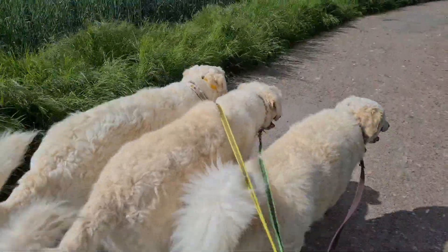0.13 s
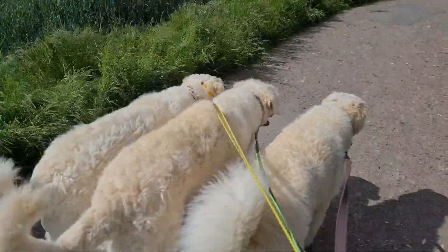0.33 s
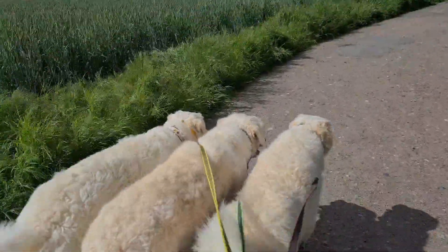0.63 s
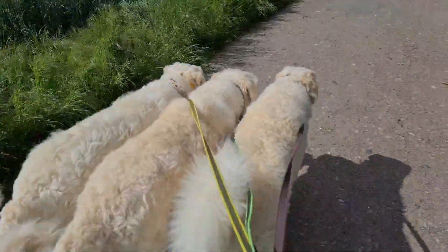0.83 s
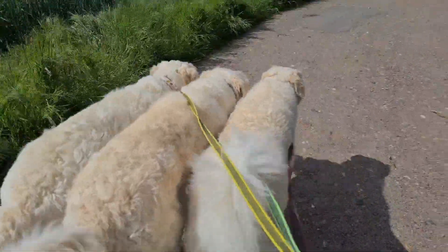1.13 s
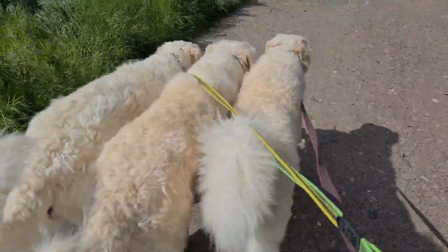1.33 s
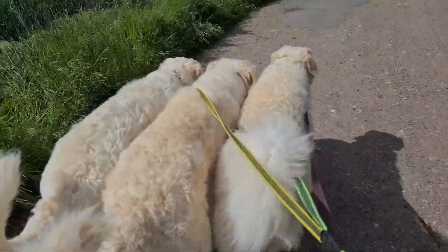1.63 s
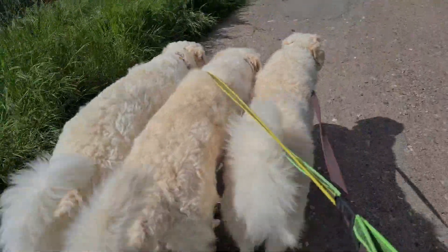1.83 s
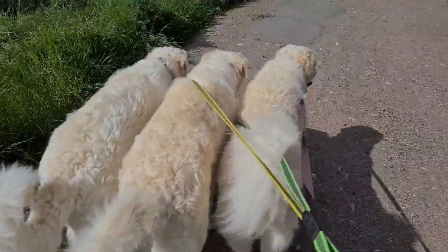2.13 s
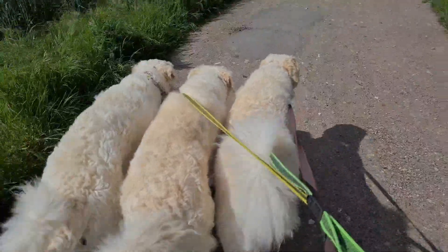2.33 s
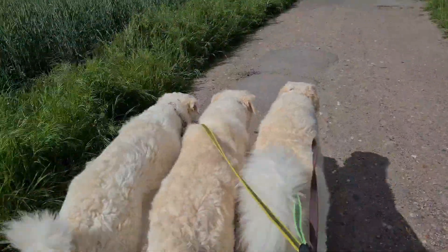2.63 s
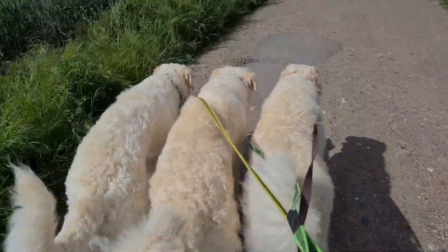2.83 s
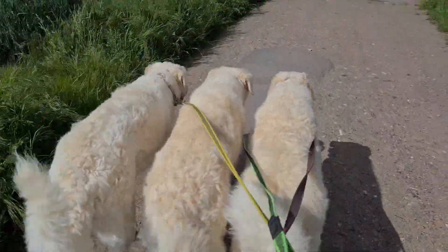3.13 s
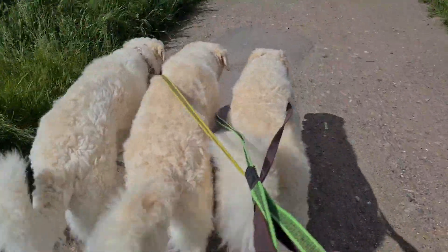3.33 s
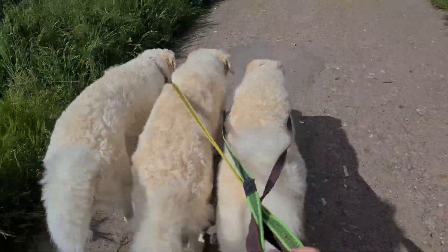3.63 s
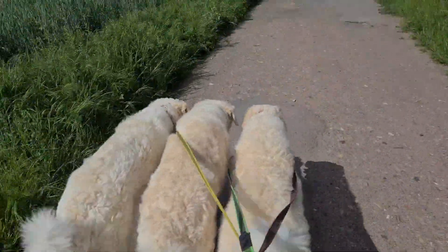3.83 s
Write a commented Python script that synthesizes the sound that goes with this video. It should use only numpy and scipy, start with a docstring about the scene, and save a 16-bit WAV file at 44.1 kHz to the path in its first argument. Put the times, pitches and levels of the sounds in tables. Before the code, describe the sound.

Soft footsteps on grit fall every half second from 0.2 s, each a low heel thud then a short crunchy scuff. Dog paws patter faintly, with irregular claw and stone ticks. A leash clip jingles thinly until about 1.3 s. Low wind buffets the microphone until 2 s, returning slightly at 3.9 s. Grass and cloth rustle quietly over a far hum. A loud, dry stone crack hits at 3.63 s.

```python
"""Walk with dogs on a gritty path

Heels thud and soles scuff on grit in light wind, while claws and small stones tick and one stone cracks sharply.
Knocks and grit are clicks sent through resonances; a leash clip jingles as a set of fading sine tones.
Wind buffeting two microphone ports is low noise, lumpy and gusty.
Grass and cloth rustle over a far hum, both made from bands of noise.
"""
import sys
import numpy as np
from scipy import signal
from scipy.io import wavfile
from scipy.ndimage import uniform_filter1d

SR = 44100
rng = np.random.default_rng(int(sys.argv[2]) if len(sys.argv) > 2 else 0)


def master(y):
    """Save y as 16-bit WAV."""
    cut = np.clip(np.atleast_2d(y).T, -1, 1)
    pcm = np.round(cut * 32767)  # scale
    wavfile.write(sys.argv[1], SR, pcm.astype(np.int16))


N = 176400

# a positive pan is louder on the left; the lag delays the left side
GROUND_PAN_DB, GROUND_LAG_S = 3.5, .00009
CLIP_PAN_DB, CLIP_LAG_S = -1.5, 1 / SR
HISS_TOP_HZ = 15950
GRIT_BITE_DB = -19  # bare click edges, relative to the ringing of the grit


def amp(db):
    """Turn decibels into a gain."""
    return 10 ** (np.asarray(db) / 20)


def unit(x):
    """Scale to an average (rms) level of 1."""
    return x / np.sqrt(np.mean(x ** 2) + 1e-20)


def in_time(rows):
    """Read a table of times and levels at every sample, with straight lines between its points."""
    times, levels = np.transpose(rows)
    return np.interp(np.arange(N) / SR, times, levels)


def at_hz(points, hz):
    """Read a table of pitches and values on a log-frequency axis."""
    pitches, values = np.transpose(points)
    return np.interp(np.log(hz), np.log(pitches), values)


def bandpass(x, low_hz, high_hz, order=2):
    """Keep only the sound between two pitches."""
    sos = signal.butter(order, [low_hz, high_hz], "band", fs=SR, output="sos")
    return signal.sosfilt(sos, x)


def lowpass(x, cutoff_hz, order):
    """Soften everything above a pitch."""
    return signal.sosfilt(signal.butter(order, cutoff_hz, fs=SR, output="sos"), x)


def drift(rate_hz):
    """Slow random wandering with rms 1: noise smoothed twice, on one point per 40 samples."""
    r = np.exp(-2 * np.pi * rate_hz * 40 / SR)
    noise = rng.standard_normal(N // 40 + 2002)
    slow = signal.lfilter([1], [1, -2 * r, r * r], noise)[2000:]  # skip the filter's start
    return np.interp(np.arange(N) / 40, np.arange(len(slow)), unit(slow))


def resonance(x, hz, width_hz):
    """Let a sound ring around one pitch, with gain 1 at the top; a narrow width rings longer."""
    r = np.exp(-np.pi * width_hz / SR)
    feedback = [1, -2 * r * np.cos(2 * np.pi * hz / SR), r * r]
    return signal.lfilter([(1 - r * r) / 2, 0, (r * r - 1) / 2], feedback, x + 1e-18)


def pulse(hz, width_hz):
    """A short knock of peak 1: a click sent through three resonances, the first twice as wide."""
    knock = -np.eye(1, 2048)[0]
    for width in (2 * width_hz, width_hz, width_hz):
        knock = resonance(knock, hz, width)
    return knock / np.abs(knock).max()


def add(out, s, sound):
    """Mix a sound in at a time in seconds."""
    i = int(s * SR)
    out[..., i:i + sound.shape[-1]] += sound[..., :N - i]


def place(x, pan_db, lag_s):
    """Place a mono sound in stereo by level, with the left side hearing it later."""
    late = np.interp(np.arange(len(x)) - lag_s * SR, np.arange(len(x)), x)
    return np.array([late * amp(pan_db / 2), x * amp(-pan_db / 2)])


def scatter(x):
    """A few milliseconds of uneven echoes from legs and ground, different on each side."""
    level_db, fade_s = -31, .004
    t = np.arange(1000) / SR
    tails = amp(level_db) * np.exp(-t / fade_s) * rng.standard_normal((2, 1000))
    return signal.fftconvolve(x[None], tails, axes=1)[:, :N]


def banded_noise(spectrum, patchy_db):
    """Half-octave bands of stereo noise, each with its own level, flicker and likeness; rms 1."""
    # how alike left and right are, 1 being the same: (pitch [Hz], likeness [ratio])
    likeness = [(100, 0.96), (400, 0.78), (800, 0.39), (1600, 0.049), (15000, 0.01)]
    out, edges = 0, 22 * 2 ** np.arange(0, 9.9, .5)
    white = rng.standard_normal((2, 2, N))
    for k, (low, high) in enumerate(zip(edges, edges[1:])):
        mid, side = bandpass(white[k % 2], low, high)  # neighbouring bands use different noise
        hz = np.sqrt(low * high)
        alike = np.clip(at_hz(likeness, hz), -1, 1)
        gain = amp(at_hz(spectrum, hz) + patchy_db * drift(11.8))
        shared = np.sqrt(1 + alike) * mid
        opposed = np.sqrt(1 - alike) * side * [[1], [-1]]
        out = out + gain * (shared + opposed)
    top_cut = signal.cheby2(12, 50, HISS_TOP_HZ + 200, fs=SR, output="sos")
    return unit(signal.sosfilt(top_cut, out))


def grains(rate, spread_db, bite_db):
    """Random clicks (rate per second) of uneven size, ringing like grit with some bare edge; rms 1."""
    # resonances of grit under soles and claws: (pitch [Hz], width [Hz], level [dB])
    grit = [(611, 180, -3.5), (1154, 153, 2.5), (1986, 505, 0), (2550, 590, 1), (3300, 1760, -2.5)]
    dull_above_hz, edge_low_hz, colour_db = 4860, 3680, 5
    sizes = amp(spread_db * np.minimum(rng.exponential(1, N), 4))
    clicks = (rng.random(N) < rate / SR) * sizes * rng.choice([-1, 1], N)
    dull = lowpass(clicks, dull_above_hz, 4)
    rings = np.zeros(N)
    for k, (hz, width_hz, db) in enumerate(grit):
        uneven = dull * amp(colour_db * rng.standard_normal(N))  # each resonance is struck differently
        rings += amp(db) * resonance(uneven, hz, width_hz) * (-1) ** k
    edge = bandpass(clicks * rng.standard_normal(N), edge_low_hz, HISS_TOP_HZ)
    return unit(unit(rings) + amp(bite_db) * unit(edge))


def wind():
    """Buffeting as lumpy low rumble, separate at each port; strong gusts also reach higher in pitch."""
    # wind strength before lumps and panning: (time [s], level [dB])
    strength = [(0, -41.5), (.13, -50), (.19, -33), (.25, -49), (.41, -33), (.49, -40), (.56, -29.5),
                (.66, -36), (.715, -24.5), (.77, -52), (.86, -32), (.97, -42), (1.02, -28.5), (1.1, -37),
                (1.17, -33.5), (1.24, -48), (1.31, -31), (1.36, -39), (1.5, -41.5), (1.55, -30.5),
                (1.61, -23.5), (1.66, -56), (1.79, -43.5), (1.87, -29.5), (2.01, -40.5), (2.08, -66),
                (3.85, -55.5), (3.94, -31), (4, -34.5)]
    low_hz, high_hz, edge_hz = 43.7, 81.7, 229
    lump_db, lump_rate_hz, pan_db = 2.5, 18.5, -1.2
    gust_db, edge_db, reach = -36, -20.5, 1.6  # the higher edge grows 1.6 times as fast in dB
    level_db = in_time(strength)
    out = []
    for side in (1, -1):
        white = rng.standard_normal((2, N))
        body = unit(bandpass(white[0], low_hz, high_hz))
        edge = unit(bandpass(np.cumsum(white[1]), high_hz, edge_hz))
        # even out the noise's own swells, so that the level curve shapes it
        even = body / np.sqrt(uniform_filter1d(body ** 2, size=1300) + 0.014)
        port_db = level_db + side * pan_db / 2 + lump_db * drift(lump_rate_hz)
        rumble = amp(port_db) * lowpass(even, edge_hz * .5, 2)
        gust_edge = amp(gust_db + edge_db + reach * (port_db - gust_db)) * edge
        out.append(rumble + gust_edge)
    return np.array(out)


def rustle():
    """Grass and cloth brushing: flickering bands of noise that swell and fade."""
    # brushing strength before the lift: (time [s], level [dB])
    strength = [(0, -65), (.15, -56.5), (.2, -73), (.26, -59), (.45, -68), (.7, -61.5), (.86, -65.5),
                (1.27, -63), (1.45, -70), (1.62, -61.5), (1.82, -61.5), (1.92, -69), (2.05, -60.5),
                (2.15, -63.5), (2.75, -62.5), (2.87, -67), (3.03, -60), (3.1, -65.5), (3.2, -61.5),
                (3.42, -67), (3.7, -63.5), (4, -60.5)]
    # tone colour: (pitch [Hz], level [dB per Hz, up to a common shift])
    colour = [(300, -13), (700, 10), (1500, 5.5), (7000, 3.5), (9000, -10.5), (12000, -4), (15500, 5)]
    lift_db, pan_db, patchy_db = 11, -3.5, 1.0
    level = amp(in_time(strength) + lift_db)
    sides = amp([[pan_db / 2], [-pan_db / 2]])
    return level * sides * banded_noise(colour, patchy_db)


def far_hum():
    """The far hum of the open field: steady noise, strongest in the low bands."""
    # tone colour: (pitch [Hz], level [dB per Hz, up to a common shift])
    colour = [(30, -5.5), (60, 2), (120, -9.5), (250, -9.5), (500, -9.5), (900, -19.5), (1500, -19.5),
              (3000, -40.5), (6500, -27), (10000, -42.5)]
    level_db, patchy_db = -53, .7
    return amp(level_db) * banded_noise(colour, patchy_db)


def paws():
    """Faint patter of many paws: random grit clicks whose level slowly wanders."""
    # patter strength before wandering and panning: (time [s], level [dB])
    strength = [(0, -58), (1.2, -55.5), (1.9, -61.5), (4, -56)]
    swing_db, swing_rate_hz = 2.5, 1.5
    level_db = in_time(strength) + swing_db * drift(swing_rate_hz)
    patter = amp(level_db) * grains(rate=450, spread_db=2.5, bite_db=GRIT_BITE_DB)
    return place(patter, GROUND_PAN_DB, GROUND_LAG_S)


def leash_clip():
    """Metal parts touch and ring at their own pitches, unevenly as they keep rattling."""
    modes = [(8540, .07), (9480, .08), (9650, .07), (10270, .1), (12880, .07), (13290, .09), (15580, .07)]
    # touches, before rattle and panning: (time [s], then one level [dB] for each mode)
    touches = [(0.0, -51, -49, -40, -67, -50, -68, -43), (0.109, -42, -44, -70, -70, -39, -70, -55),
               (0.128, -43, -44, -68, -56, -60, -70, -47), (.144, -45, -44, -68, -70, -58, -70, -60),
               (0.5936, -31.5, -66, -46, -34, -56, -62, -35), (0.898, -45, -68, -47, -60, -70, -52, -44),
               (0.918, -46.5, -60, -51, -66, -70, -53, -56), (1.235, -37.5, -70, -42, -48, -70, -60, -56),
               (1.256, -52, -70, -42, -45.5, -70, -52, -46)]
    rattle_db, rattle_rate_hz = 4, 130
    rings, t = np.zeros((len(modes), N)), np.arange(SR // 4) / SR
    for s, *levels in touches:
        for ring, db, (hz, fade_s) in zip(rings, levels, modes):
            add(ring, s, amp(db - 60 * t / fade_s) * np.sin(2 * np.pi * hz * t))
    jingle = sum(ring * amp(rattle_db * drift(rattle_rate_hz)) for ring in rings)
    return place(jingle, CLIP_PAN_DB, CLIP_LAG_S)


def ticks():
    """Claws and stones give short resonant knocks; one stone cracks sharply with a small rattle."""
    # claw and stone knocks, before panning: (time [s], peak [dB], pitch [Hz])
    knocks = [(0.0387, -32, 1620), (0.1097, -33, 1490), (0.1233, -31.5, 1270), (0.2928, -22.5, 3280),
              (0.3115, -29, 2420), (0.5503, -32.5, 1780), (0.604, -29, 1750), (0.6171, -21, 1660),
              (0.881, -35.5, 2200), (0.971, -32, 1290), (1.0613, -37.5, 1000), (1.0996, -30, 1800),
              (1.1428, -31, 2240), (1.2217, -32, 1800), (1.487, -28.5, 2100), (1.685, -34.5, 1170),
              (1.73, -28.5, 1130), (1.78, -33, 1900), (2.1773, -33, 1580), (2.2386, -28.5, 1390),
              (2.3065, -27, 1760), (2.3675, -30.5, 1710), (2.567, -33.5, 1190), (2.6636, -32, 1770),
              (3.0877, -24, 2250), (3.2029, -23.5, 1160), (3.396, -26, 2100)]
    # the sharp crack and its rattle, before panning: (time [s], peak [dB], pitch [Hz], width [Hz])
    crack = [(3.6316, -8.5, 1910, 1300), (3.633, -30, 1440, 600), (3.6344, -26, 2600, 600)]
    out = np.zeros(N)
    for s, db, hz in knocks:
        add(out, s, amp(db) * pulse(hz, hz / 1.12))
    for s, db, hz, width_hz in crack:
        add(out, s, amp(db) * pulse(hz, width_hz))
    return place(out, GROUND_PAN_DB, GROUND_LAG_S) + scatter(out)


def snaps():
    """Bright snaps of grit: a high knock with a brief spray of noise behind it."""
    # snaps, before panning: (time [s], peak of the knock [dB], pitch [Hz])
    bright = [(0.107, -27.5, 12000), (0.1907, -37, 6500), (0.267, -31, 7000), (0.3622, -29.5, 5300),
              (0.3674, -21, 5840), (0.5675, -33, 6030), (0.595, -25.5, 7500), (0.8814, -38, 6040),
              (0.897, -38, 7000), (1.487, -27.5, 10300), (1.527, -31.5, 4050), (1.628, -34, 5900),
              (1.653, -26, 5630), (1.74, -32, 9500), (1.7598, -27.5, 5060), (1.7654, -33, 6300),
              (2.3055, -31, 6800), (2.739, -34.5, 4170), (3.04, -36.5, 3460), (3.338, -37, 11000),
              (3.6316, -32, 7000)]
    spray_peak_s, spray_gain = 0.0015, amp(-6) / 2
    knocks, spray, t = np.zeros(N), np.zeros((2, N)), np.arange(600) / SR
    noise = bandpass(rng.standard_normal((len(bright), 2, 600)), 2000, 15000, order=1)
    puff = t / spray_peak_s * np.exp(1 - t / spray_peak_s)  # quick rise, then a fade
    for (s, db, hz), hiss in zip(bright, noise):
        add(knocks, s, amp(db) * pulse(hz, hz / 1.6))
        add(spray, s, amp(db) * spray_gain * puff * hiss)
    return place(knocks, CLIP_PAN_DB, CLIP_LAG_S) + spray


def steps():
    """Each step is a low heel thud, a sole slap, then a swell of crushed grit."""
    # steps; scuff timing is for its peak, its level is before panning:
    # (heel time [s], heel peak [dB], scuff delay [s], scuff rise width [s], scuff level [dB])
    walk = [(0.202, -41.5, 0.044, 0.02, -38.5), (0.697, -51, 0.073, 0.055, -44.5),
            (1.186, -42, 0.045, 0.021, -46.5), (1.68, -44, 0.052, .022, -43.5),
            (2.155, -38, 0.09, 0.015, -40), (2.653, -40.5, 0.043, 0.027, -42.5),
            (3.126, -35.5, 0.067, 0.04, -42), (3.604, -36.5, 0.053, 0.049, -47.5)]
    heel_hz, heel_width_hz = 167, 207
    sole_hz, sole_delay_s, sole_db = 322, 0.01176, -3  # level relative to the heel
    fall = 0.71  # the scuff dies away in this share of its rise width
    t, thuds, swell = np.arange(N) / SR, np.zeros(N), np.zeros(N)
    for s, heel_db, delay, width, scuff_db in walk:
        add(thuds, s, amp(heel_db) * pulse(heel_hz, heel_width_hz))
        add(thuds, s + sole_delay_s, amp(heel_db + sole_db) * pulse(sole_hz, sole_hz))
        u = (t - s - delay) / width
        swell += amp(scuff_db) * np.exp(-.5 * np.where(u > 0, u / fall, u) ** 2)
    crunch = swell * grains(rate=1000, spread_db=3.0, bite_db=GRIT_BITE_DB)
    return thuds + place(crunch, GROUND_PAN_DB, GROUND_LAG_S) + scatter(crunch)


def scene():
    """All sources in the open air, simply added together."""
    background = wind() + rustle() + far_hum()
    return background + paws() + leash_clip() + ticks() + snaps() + steps()


def record(dry):
    """Cut the top steeply, by at least 70 dB from 17050 Hz up."""
    return signal.sosfilt(signal.cheby2(14, 70, 17050, fs=SR, output="sos"), dry)


dry = scene()
out = record(dry)
master(out)
```